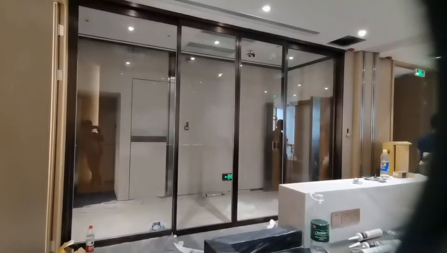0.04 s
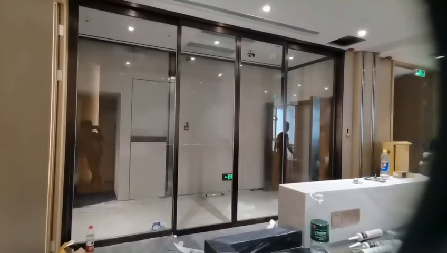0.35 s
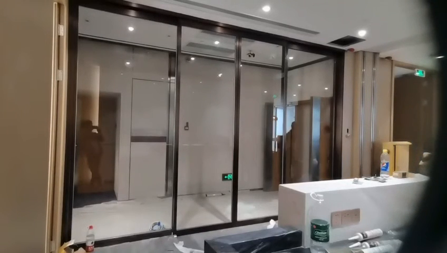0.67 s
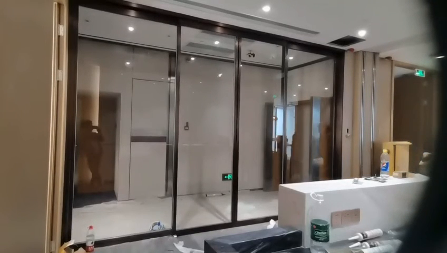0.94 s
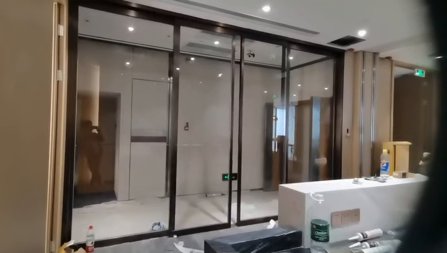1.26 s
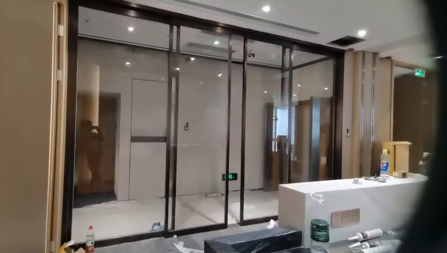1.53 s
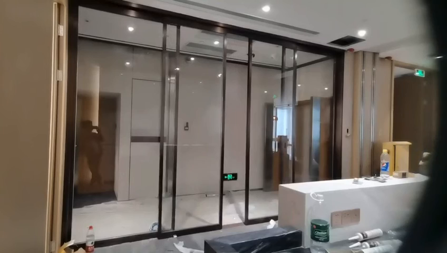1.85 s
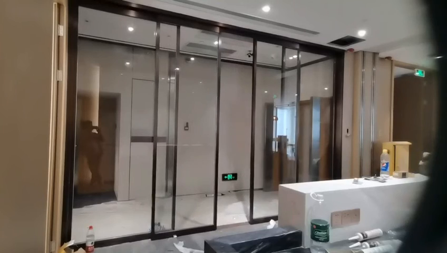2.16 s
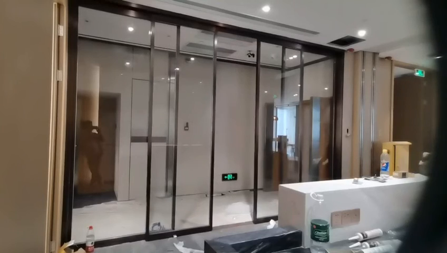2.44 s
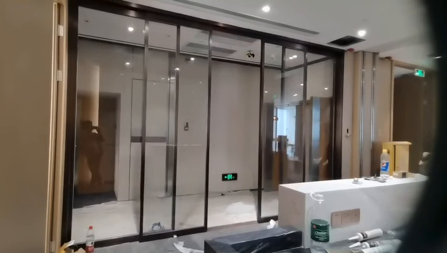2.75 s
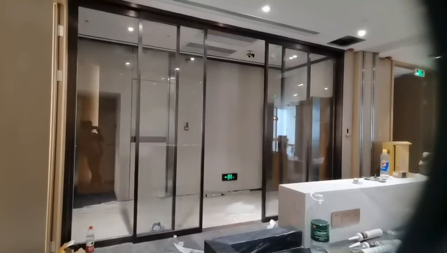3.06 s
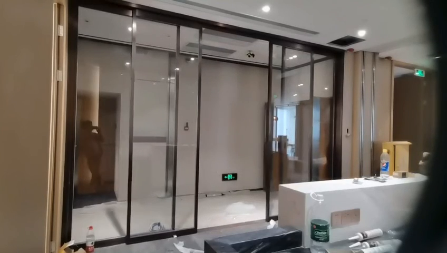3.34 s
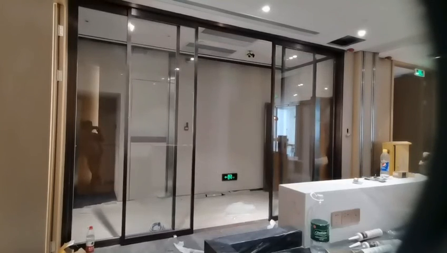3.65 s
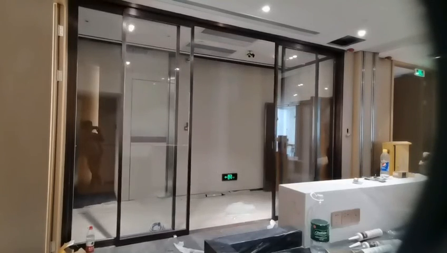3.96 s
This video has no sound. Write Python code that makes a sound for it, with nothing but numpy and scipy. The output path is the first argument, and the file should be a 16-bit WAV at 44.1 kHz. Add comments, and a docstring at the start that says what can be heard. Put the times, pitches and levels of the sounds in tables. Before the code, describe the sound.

An automatic glass door opens in a quiet, hard-walled lobby. Its lock and drive clack at about 0.2 and 0.8 seconds. The motor then hums while rollers rumble and hiss along the track, with dull panel bumps and another clack near 2.2 seconds. The door slows after 3.3 seconds. Soft scuffs and light ticks occur nearby, and a heavy knock with quick rebounds lands just before 4 seconds.

```python
"""An automatic glass door rolls open in a hard-walled lobby. Its lock and drive clack, then the motor
hums while the rollers rumble, shake the panels and hiss along the track. Soft scuffs and ticks sound
nearby over still air, and a heavy knock with rebounds comes at the end."""
import sys
import numpy as np
from scipy import signal
from scipy.fft import rfft, irfft, next_fast_len
from scipy.io import wavfile
from scipy.ndimage import uniform_filter1d

SR = 44100
rng = np.random.default_rng(int(sys.argv[2]) if len(sys.argv) > 2 else 0)


def transcribe(signal):
    """Save signal, clipped to [-1, 1], as a 16-bit WAV file at the path in sys.argv[1]."""
    frames = np.atleast_2d(signal).T
    limited = np.clip(frames, -1, 1)
    pcm = np.round(limited * 32767).astype(np.int16)
    wavfile.write(sys.argv[1], SR, pcm)


N = 176400
T = np.arange(N) / SR
FFT_SIZE = 2 * next_fast_len(N // 2 + SR // 4, real=True)
HZ = np.maximum(np.arange(FFT_SIZE // 2 + 1) * SR / FFT_SIZE, 1)
ROOM_T60_S = .53


def amp(db):
    """Decibels to gain."""
    return 10 ** (np.asarray(db) / 20)


def shape(points):
    """Gain per bin from (freq_hz, gain_db) points."""
    hz, db = np.array(points).T
    return amp(np.interp(np.log(HZ), np.log(hz), db))


def through(x, response):
    """Apply a frequency response."""
    return irfft(rfft(x, FFT_SIZE) * response, FFT_SIZE)[..., :N]


def colour(x, gain):
    """Minimum-phase filter; keeps white-noise power."""
    cepstrum = irfft(np.log(gain / np.sqrt(np.mean(gain ** 2)) + 1e-9))
    cepstrum[1:FFT_SIZE // 2] *= 2
    cepstrum[FFT_SIZE // 2 + 1:] = 0
    return through(x, np.exp(rfft(cepstrum)))


def resonances(modes):
    """Gain per bin of a body with steep-sided resonances."""
    return sum(amp(db) / (1 + ((HZ - hz) / (.5 * width)) ** 2) for hz, width, db in modes)


def ring(x, hz, width_hz):
    """One resonance; keeps white-noise power."""
    return signal.lfilter(*signal.iirpeak(hz, hz / width_hz, fs=SR), x) * np.sqrt(SR / (np.pi * width_hz))


def join_bands(parts, edges_hz):
    """Crossover: one band from each part, bass first."""
    below = [0] + [1 / (1 + (HZ / hz) ** 6) for hz in edges_hz] + [1]
    return sum(through(part, below[k + 1] - below[k]) for k, part in enumerate(parts))


def noise(grain_db=0):
    """Mid and side noise; uneven sample sizes make it grainy."""
    x = rng.standard_normal((2, N)) * amp(grain_db * rng.standard_normal(N))
    return x / x.std()


def drift(rate_hz):
    """Smooth random curve, unit spread."""
    hold = int(SR / rate_hz)
    steps = rng.standard_normal(1000)[np.arange(N) // hold]
    x = uniform_filter1d(uniform_filter1d(steps, hold), hold)
    return x / x.std()


def fade(start_s, t60_s, contact_s=.0012):
    """Onset rounded by contact time, exponential decay."""
    onset = .5 + .5 * np.tanh((T - start_s) / contact_s)
    return onset * np.exp(-np.log(1000) * np.maximum(T - start_s, 0) / t60_s)


def swell(peak_s, rise_s, t60_s):
    """Gaussian rise, exponential decay."""
    rise = np.exp(-(np.minimum(T - peak_s, 0) / rise_s) ** 2)
    return rise * np.exp(-np.log(1000) * np.maximum(T - peak_s, 0) / t60_s)


def frame_modes(spacing_hz=22, uneven_db=2.8):
    """Gain per bin of the metal frame's many narrow, uneven modes."""
    knots_hz = np.arange(4000) * spacing_hz
    ripple = np.interp(HZ, knots_hz, rng.standard_normal(len(knots_hz)))
    return amp(uneven_db * ripple * np.minimum(HZ / 600, 1))


# air spectrum: freq_hz, density_db
AIR_SPECTRUM = [(25, -12.5), (65, 2.5), (100, -16), (200, -22), (600, -34), (3200, -31), (5000, -31.5),
                (6500, -21.5), (8000, -32), (10000, -36.5), (15000, -47)]

def air(level_db=-56):
    """Still air of the lobby: steady, faint noise."""
    return amp(level_db) * colour(noise(), shape(AIR_SPECTRUM))


# dry ticks: start_s, level_db
TICK_EVENTS = [(2.49, -52), (3.0245, -34), (3.277, -48), (3.565, -49), (3.863, -34)]
# tick spectrum: freq_hz, density_db
TICK_SPECTRUM = [(200, -25), (3000, -16), (5000, -8), (7000, 4.5), (10000, -4), (12500, -16), (15000, -15)]

def ticks(room_db=-36):
    """Light, close clicks with little room."""
    envelope = 0
    for start_s, db in TICK_EVENTS:
        direct = swell(start_s, rise_s=.001, t60_s=.022)
        envelope += amp(db) * (direct + amp(room_db) * fade(start_s, ROOM_T60_S))
    return colour(envelope * noise(), shape(TICK_SPECTRUM))


# scuffs and rustles: peak_s, rise_s, level_db, low_db, treble_db, top_db
SCUFF_EVENTS = [(.40, 0.062, -53.5, 11, 14.5, -14), (.47, 0.064, -51, -1, -4, -14),
                (.54, 0.027, -53.5, 0.5, -13, -15), (.73, 0.058, -62, 18, -17, -9),
                (.80, .03, -58, 14, -14, -6), (1.191, 0.051, -48, -1.5, 13.5, 12),
                (1.40, 0.097, -50, 6, -6, 8.5), (1.58, 0.071, -52, -2, 14.5, 8),
                (3.24, 0.059, -56, 15.5, -12, -16), (3.293, 0.023, -47.5, 7.5, 12.5, -11),
                (3.574, 0.023, -47.5, 2.5, 12.5, 13.5), (3.65, 0.017, -50.5, 3.5, 12, 7),
                (3.705, 0.036, -41, -4.5, 7, 6), (3.83, 0.033, -53, 1, 14, 2),
                (3.87, 0.017, -49.5, 1, 21.5, 18), (3.925, 0.021, -49, -1, 18.5, 11)]
# scuff spectrum: freq_hz, density_db
SCUFF_SPECTRUM = [(60, -22), (250, 7.5), (700, 5.5), (1300, 6), (2300, 6), (3200, -1.5), (4200, -6),
                  (5200, -10.5), (7000, -4.5), (10000, -12.5), (11700, -19), (15000, -33)]

def scuffs():
    """Short gritty rubs dying away in the lobby."""
    power = 0
    for peak_s, rise_s, db, low_db, treble_db, top_db in SCUFF_EVENTS:
        band_gains = amp(db) * amp([low_db, 0, treble_db, top_db])
        power += (band_gains[:, None] * swell(peak_s, rise_s, t60_s=.52)) ** 2
    bands = np.sqrt(power)[:, None] * noise(grain_db=3)
    return colour(join_bands(bands, edges_hz=(1000, 4800, 9000)), shape(SCUFF_SPECTRUM))


# blow and rebounds: start_s, level_db, bass_db
KNOCK_HITS = [(3.945, -28, -7), (3.95, -26.5, 3.5), (3.961, -37.5, 3), (3.978, -32.5, 4)]
# hollow ring: freq_hz, width_hz, gain_db
KNOCK_MODES = [(70, 22, 2), (129, 30.6, 0.5), (214, 29, -2.5), (266, 22, 1), (318, 37, 4), (383, 19, 5),
               (714, 114, -2.5), (980, 54, -13), (1200, 110, -11), (1324, 68, 3.5), (1584, 30, -18),
               (1720, 60, -5), (2020, 24, -19), (2680, 20, -21)]
# crack spectrum: freq_hz, density_db
CRACK_SPECTRUM = [(40, 10), (400, 2.5), (1000, 5), (2500, -1), (4500, -8), (7000, -3.5), (10000, -13),
                  (15000, -22)]

def knock(crack_db=2):
    """Heavy blow with rebounds: a hollow ring under a broad crack."""
    bands = np.zeros((3, 2, N))
    for start_s, db, bass_db in KNOCK_HITS:
        burst = amp(db) * fade(start_s, t60_s=.45) * noise(grain_db=2.5)
        bands += amp([bass_db, 0, 0])[:, None, None] * burst
    blows = join_bands(bands, edges_hz=(300, 5000))
    return colour(blows, resonances(KNOCK_MODES)) + amp(crack_db) * colour(blows, shape(CRACK_SPECTRUM))


# lock and drive clacks: start_s, level_db, bass_db, top_db, snap_db, ring_hz, ring_db
CLACK_EVENTS = [(0.146, -32.5, 7, 7.5, -8, 1720, -27), (0.185, -32.5, -5, -2, 12, 5750, -8),
                (.207, -34, 5.5, -10, 9, 7400, -8.5), (0.826, -32, -15, 11, 7, 6700, -21),
                (0.847, -32.5, -3, 2, 13, 7600, -13.5), (0.873, -41, 1, -21, 9, 7040, -3),
                (2.171, -38, -6, -4, 2.5, 3350, -6.5), (2.198, -39, -16, -2, 11, 4150, -9)]
# clack spectrum: freq_hz, density_db
CLACK_SPECTRUM = [(30, -8), (70, -3), (140, -0.5), (240, 2), (450, -2.5), (700, -6), (1150, -0.5),
                  (1450, -5), (1780, 0), (2400, -2.5), (3200, -3), (4200, -1), (5000, -3), (6800, 3.5),
                  (7800, -2.5), (10500, -12), (13000, -20), (15000, -29)]

def clacks(frame, build_s=.008):
    """Metal parts snap together and ring; dense reflections off glass and stone follow."""
    bands, rings = np.zeros((3, 2, N)), 0
    for start_s, db, bass_db, top_db, snap_db, ring_hz, ring_db in CLACK_EVENTS:
        grains = amp(db) * noise(grain_db=1.5)
        build = 1 - np.exp(-np.maximum(T - start_s, 0) / build_s)
        tail = build * fade(start_s, ROOM_T60_S) * grains
        snap = amp(snap_db) * fade(start_s, t60_s=.028) * grains
        bands += amp([bass_db, 0, top_db])[:, None, None] * (tail + .5 * snap)
        rings += amp(ring_db) * ring(tail + 2 * snap, ring_hz, width_hz=420)
    impacts = join_bands(bands, edges_hz=(900, 8000))
    return colour(impacts, shape(CLACK_SPECTRUM) * frame) + colour(rings, frame)


# track resonances: peak_s, half_length_s, freq_hz, width_hz, level_db
TRACK_MODES = [(1.44, 0.081, 4230, 453, -52.5), (1.34, 0.3, 5800, 410, -60), (2.8, 0.76, 4400, 300, -72),
               (2.98, 0.24, 2260, 380, -58), (0.549, 0.037, 3800, 600, -55.5)]

def track_ring(frame):
    """The track rings faintly as rollers pass."""
    rub, rings = noise(), 0
    for peak_s, half_s, hz, width_hz, db in TRACK_MODES:
        passing = np.exp(-((T - peak_s) / half_s) ** 2)
        rings += amp(db) * passing * ring(rub, hz, width_hz)
    return colour(rings, frame)


# hiss envelope: time_s, gain_db
HISS_ENVELOPE = [(.6, -54), (.8, -10), (1.05, -2.5), (1.4, 0.5), (1.7, 0), (2.0, -3.5), (2.15, 1),
                 (2.9, -1.5), (3.15, -5), (3.5, -1), (4.0, -19)]
# hiss spectrum: freq_hz, density_db
HISS_SPECTRUM = [(1000, -11.5), (2400, -9.5), (3400, -16), (4200, -4.5), (5100, -7.5), (6200, -2.5),
                 (6900, 1.5), (7900, -4.5), (10000, -18), (11500, -22.5), (13500, -21.5), (15000, -53.5)]

def roller_hiss(frame, level_db=-49.5, flutter_db=1.44):
    """Rollers in the track: a fine, grainy hiss that flutters."""
    envelope_db = np.interp(T, *np.array(HISS_ENVELOPE).T)
    gain = amp(level_db + envelope_db + flutter_db * drift(rate_hz=42))
    return colour(gain * noise(grain_db=6.5), shape(HISS_SPECTRUM) * frame)


# drive run: time_s, pitch_hz, effort_db
DRIVE_RUN = [(.65, 147.3, -42), (.85, 197.9, -13), (1.0, 229.8, -8.5), (1.131, 262.1, -3.5),
             (1.301, 247.2, -4.5), (1.5, 253.1, -2.5), (1.848, 256, -0.5), (2.0, 248, -1.5), (2.3, 248, -1),
             (2.5, 268, -2), (2.8, 274, -2), (3.1, 269, -0.5), (3.299, 251.5, -2.5), (3.55, 242, -6.5),
             (3.801, 230, -8), (4.0, 213, -16)]

def drive():
    """Effort (gain) and motor pitch as the drive speeds up, runs and slows."""
    times_s, pitch_hz, effort_db = np.array(DRIVE_RUN).T
    return amp(np.interp(T, times_s, effort_db, left=-60)), np.interp(T, times_s, pitch_hz)


# panel bumps in the track: peak_s, rise_s, level_db, boom_hz, boom_db
PANEL_BUMPS = [(.06, 0.027, -57, 62.4, -51.5), (0.169, 0.043, -39, 138.2, -51), (.31, 0.025, -44, 90, -58),
               (.41, 0.021, -43.5, 51.6, -57), (.73, 0.086, -43.5, 87, -46), (.89, 0.016, -43, 110.6, -50),
               (.99, 0.035, -53, 138.6, -46.5), (1.38, 0.028, -42, 135, -41), (1.75, 0.078, -45, 88.6, -46),
               (2.081, 0.061, -58, 111.1, -42), (2.28, 0.1, -52, 89.2, -49), (2.421, 0.15, -56, 113.8, -45),
               (3.08, 0.041, -61, 114.8, -50.5), (3.30, 0.026, -49, 132, -43.5)]
# panel resonances: freq_hz, width_hz, gain_db
PANEL_MODES = [(50.6, 20, 0), (83, 21, -5), (118, 37, -11), (133.5, 13.5, -4.5), (182, 85, -11.5)]

def panels(effort, rumble_db=-49.5):
    """Rollers shake the glass panels; each dull bump adds a low boom."""
    power, booms = (amp(rumble_db) * effort) ** 2, 0
    for peak_s, rise_s, db, boom_hz, boom_db in PANEL_BUMPS:
        push = swell(peak_s, rise_s, t60_s=.52)
        power += (amp(db) * push) ** 2
        tone = np.sqrt(2) * np.sin(2 * np.pi * (boom_hz * T + rng.random()))
        booms += amp(boom_db) * push * tone
    return booms + colour(noise() * np.sqrt(power), resonances(PANEL_MODES))


# rolling spectrum: freq_hz, density_db
ROLL_SPECTRUM = [(25, -10), (45, -10), (100, -6.5), (180, -5.5), (235, 3.5), (310, -1.5), (380, -2),
                 (500, -11.5), (750, -12), (1100, -17), (1600, -29), (2400, -33), (3300, -35), (6000, -52)]

def roller_rumble(effort, level_db=-44.5):
    """Low, grainy rolling noise that follows drive effort."""
    return amp(level_db) * colour(noise(grain_db=6) * effort, shape(ROLL_SPECTRUM))


# motor partials: pitch_ratio, level_db, waver_hz
HUM_PARTIALS = [(.46, -51.5, 7), (1, -46.5, 12), (1.12, -55.5, 14), (1.45, -57, 18)]

def motor_hum(effort, pitch_hz, swell_db=2):
    """Partials track the motor, each wavering in level and phase."""
    phase = 2 * np.pi * np.cumsum(pitch_hz) / SR
    hum = 0
    for ratio, db, waver_hz in HUM_PARTIALS:
        waver = 1 + .5 * (drift(2 * waver_hz) + 1j * drift(2 * waver_hz))
        hum += amp(db) * np.real(waver * np.exp(1j * ratio * phase))
    return hum * effort * amp(swell_db * drift(rate_hz=9))


# stereo width: freq_hz, side_over_mid_db
STEREO_WIDTH = [(50, 3), (150, -31), (300, -6), (600, -6), (1100, 0.5), (15000, -0.1)]
# stereo balance: freq_hz, left_over_right_db
STEREO_BALANCE = [(50, 8), (110, 8.5), (250, 4), (400, 2), (650, -2.5), (1200, -1), (2400, 0), (4400, -1),
                  (7000, -4), (10000, 4), (15000, -4)]

def scene():
    """Sum as mid and side, decode to left and right; the bass leans left."""
    frame = frame_modes()
    effort, pitch_hz = drive()
    door = panels(effort) + roller_rumble(effort) + motor_hum(effort, pitch_hz)
    door += roller_hiss(frame) + track_ring(frame) + clacks(frame)
    mid, side = door + ticks() + scuffs() + knock() + air()
    width, lean = shape(STEREO_WIDTH), np.sqrt(shape(STEREO_BALANCE))
    mid = through(mid, 1 / np.hypot(1, width))
    side = through(side, width / np.hypot(1, width))
    return np.array([through(mid + side, lean), through(mid - side, 1 / lean)])


def record(dry):
    """Deep treble notch, then a steep low-pass."""
    notch_hz, half_width_hz, notch_db, cutoff_hz = 8915, 623, -29, 15300
    notch = amp(notch_db * np.exp(-((HZ - notch_hz) / half_width_hz) ** 4))
    lowpass = signal.ellip(10, .2, 80, cutoff_hz, fs=SR, output="sos")
    return signal.sosfilt(lowpass, through(dry, notch))


dry = scene()
out = record(dry)
transcribe(out)
```